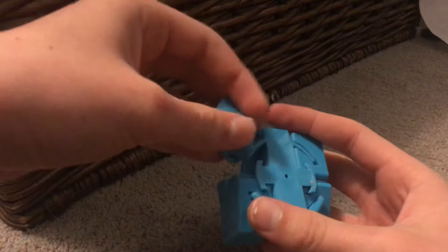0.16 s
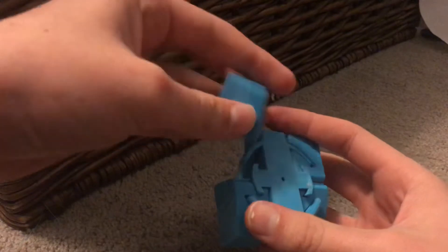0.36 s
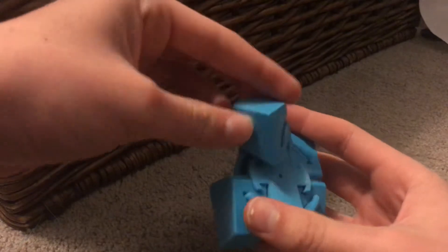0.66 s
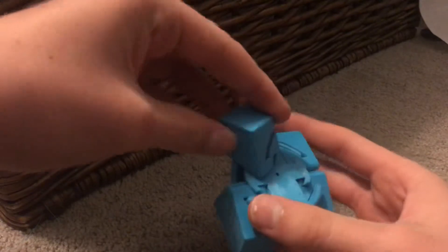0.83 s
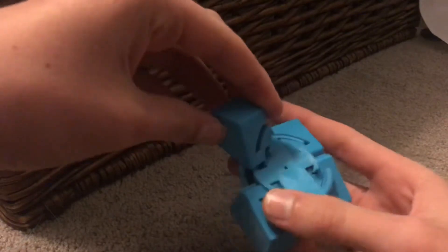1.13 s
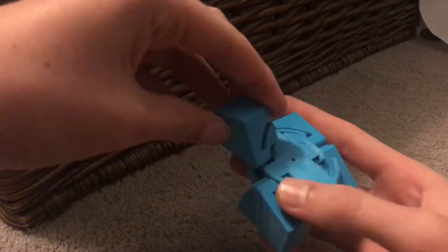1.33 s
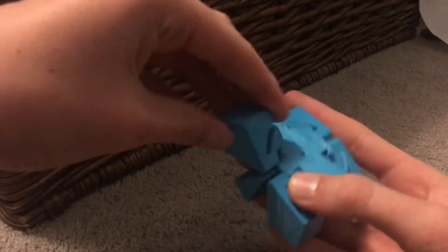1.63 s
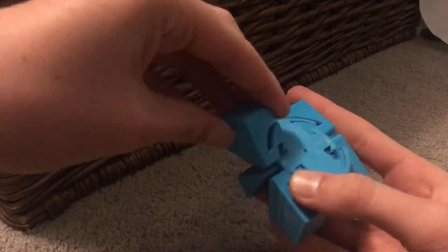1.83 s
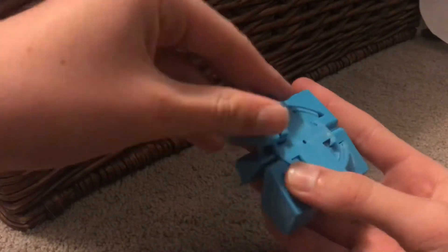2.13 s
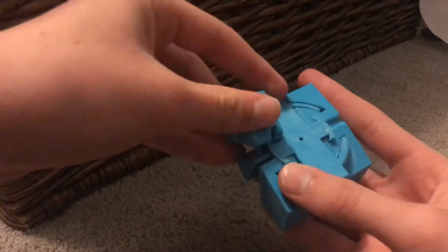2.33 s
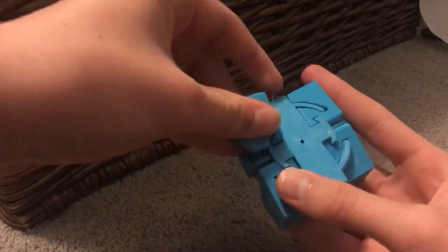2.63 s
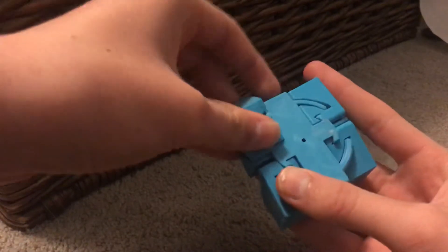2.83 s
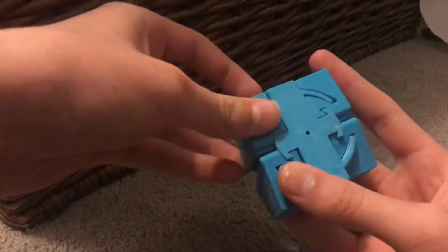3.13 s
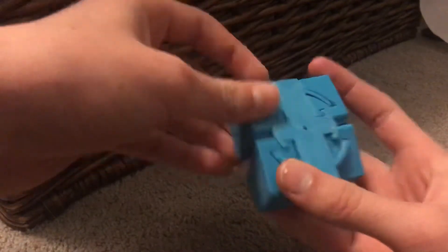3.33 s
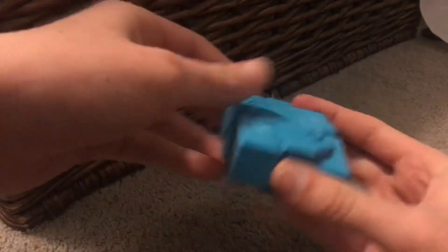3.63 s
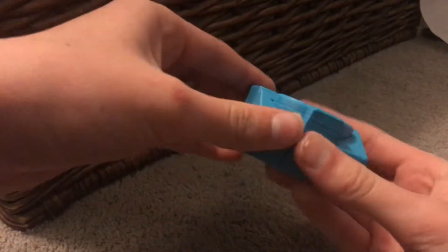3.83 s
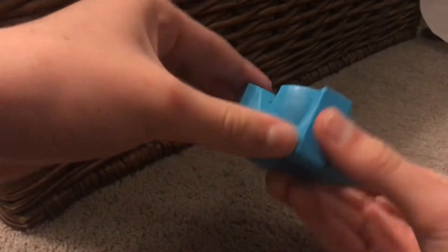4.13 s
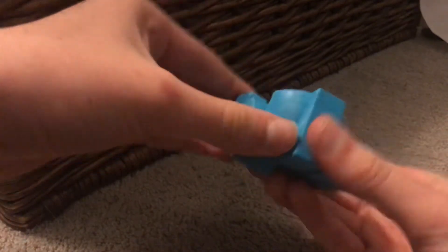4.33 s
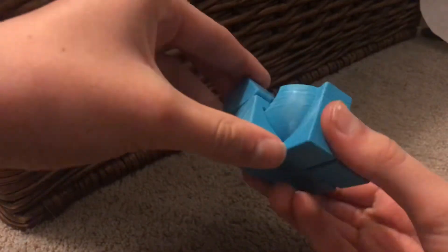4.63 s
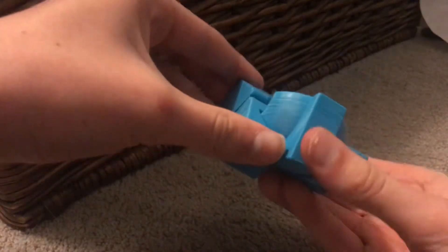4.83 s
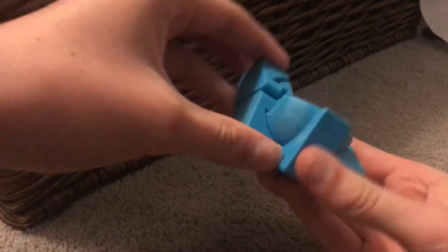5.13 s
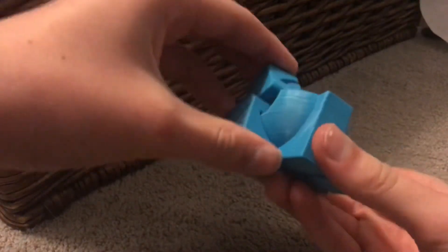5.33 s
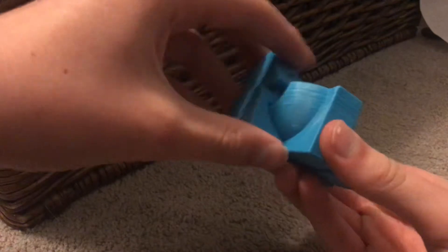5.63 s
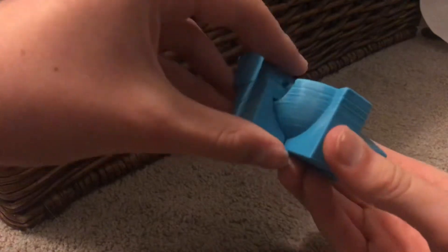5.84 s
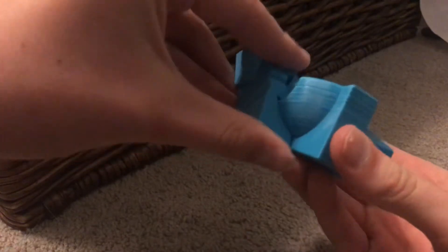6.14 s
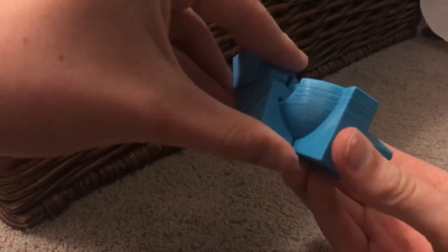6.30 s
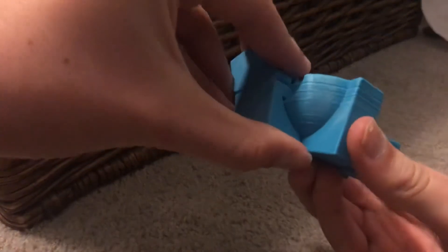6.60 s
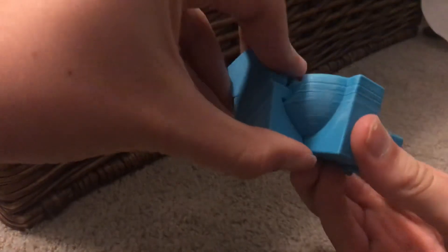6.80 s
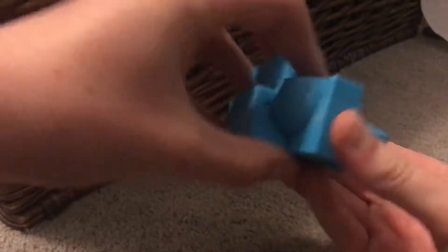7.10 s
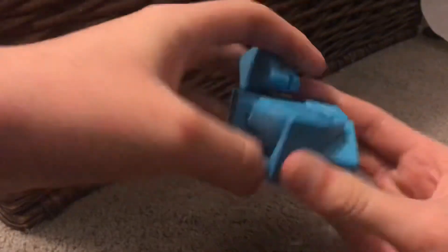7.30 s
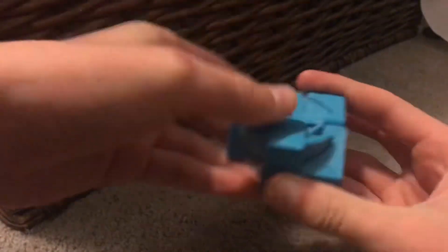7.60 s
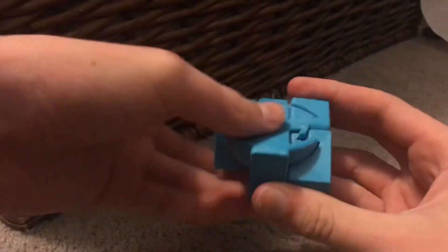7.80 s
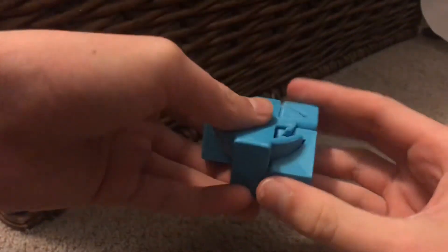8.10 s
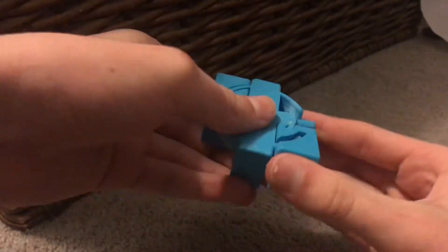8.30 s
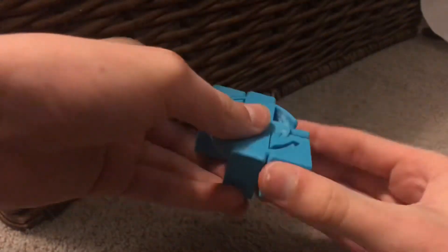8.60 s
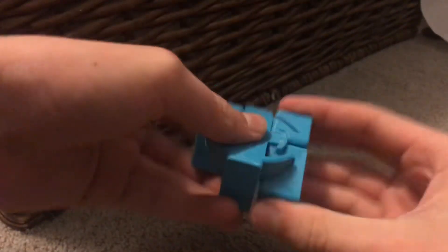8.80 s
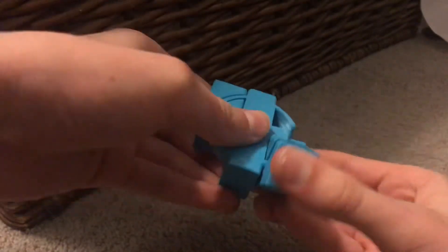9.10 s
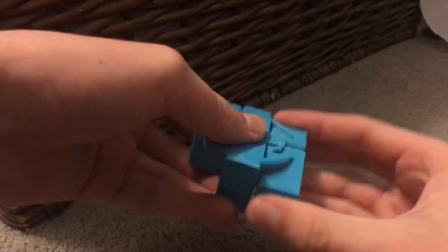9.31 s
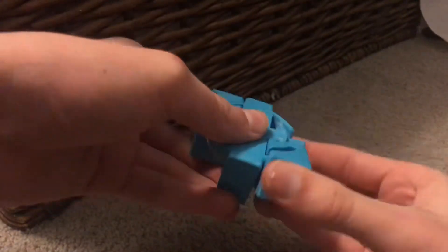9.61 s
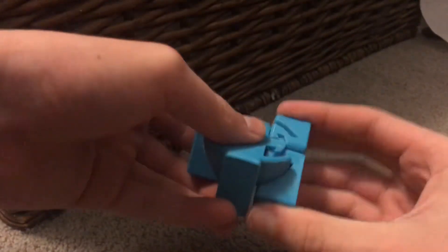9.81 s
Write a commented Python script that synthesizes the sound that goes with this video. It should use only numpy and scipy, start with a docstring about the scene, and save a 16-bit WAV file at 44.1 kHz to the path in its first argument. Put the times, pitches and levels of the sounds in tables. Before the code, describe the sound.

Close to the microphone in a small carpeted room, hands work a hollow plastic twisty puzzle. Light finger brushes and a few clicks come first, then two hard, bright snaps as layers seat. Short scrapes and denser clacks follow, with a busy rattling stretch before one layer is rocked back and forth in soft, regular rasps. Soft low hand thumps, faint mains hum and a low rush of air lie beneath.

```python
"""A plastic twisty puzzle is turned by hand close to the microphone in a small carpeted room.
Clicks and snaps are short bursts of force shaped by the spectrum of the plastic, with decaying tones added.
Scrapes, finger brushes and the final to-and-fro of one layer are tiny random slips through that spectrum.
The hands add soft low thumps; a mains hum of sines and a low rush of shaped noise lie underneath."""
import sys
import numpy as np
from scipy import signal
from scipy.fft import rfft, irfft
from scipy.io import wavfile
from scipy.ndimage import uniform_filter1d

SR = 44100
rng = np.random.default_rng(int(sys.argv[2]) if len(sys.argv) > 2 else 0)


def wav_out(sig):
    """Save sig, one row per channel (or a flat mono array), as 16-bit PCM at SR to the path in sys.argv[1]."""
    wavfile.write(sys.argv[1], SR, np.round(np.clip(np.atleast_2d(sig).T, -1, 1) * 32767).astype(np.int16))


N = 438793  # length in samples


def amp(db):
    """Turns dB into a linear gain."""
    return 10 ** (np.asarray(db) / 20)


def evened(x):
    """Scales to rms 1."""
    return x / np.sqrt(np.mean(x ** 2) + 1e-20)


def read(points, hz):
    """Joins (Hz, value) points on a log-frequency axis."""
    f, value = np.transpose(points)
    return np.interp(np.log(hz + 1), np.log(f + 1), value)


def add(mix, s, sound):
    """Mixes a sound in at time s."""
    part = mix[max(round(s * SR), 0):][:len(sound)]
    part += sound[:len(part)]


def wander(n, hz):
    """Slow chance of rms 1, changing up to about hz times a second."""
    f = np.fft.rfftfreq(n, 1 / SR)
    noise = rfft(rng.standard_normal(n))
    return evened(irfft(noise / (1 + (f / hz) ** 4), n))


def causal(db):
    """The fastest-decaying impulse response with this spectrum."""
    mirrored = np.r_[db, db[-2:0:-1]]
    log_gain = np.log(amp(mirrored))
    return np.fft.ifft(np.exp(np.conj(signal.hilbert(log_gain)))).real[:len(db)]


def bump(hz, centre_hz, width_hz):
    """Shape of one resonance, 1 at its centre."""
    return 1 / (1 + (2 * (hz - centre_hz) / width_hz) ** 2)


# Knock lies below 1.1 kHz and clack around 3 kHz: level at depth 0 in dB, and dB per dB of depth
KNOCK_DB, KNOCK_PER_DEPTH = 4, 1.07
CLACK_DB, CLACK_PER_DEPTH = 2.5, 0.57


def place_db(hz, depth_db, edge_db):
    """A deep contact gives knock, hollow body and clack; a sharp edge gives treble."""
    knock_db = KNOCK_DB + KNOCK_PER_DEPTH * depth_db
    clack_db = CLACK_DB + CLACK_PER_DEPTH * depth_db
    body = [(1100, knock_db), (1550, depth_db), (2400, depth_db)]
    clack = [(2800, clack_db), (3700, clack_db)]
    treble = [(4400, 0), (8500, 0), (11000, edge_db)]
    return read(body + clack + treble, hz)


# Resonances of the hollow plastic. Each row: centre in Hz, width in Hz, boost in dB.
SHELL = [(1740, 820, -0.5), (2414, 340, -0.5), (3180, 180, -1), (3270, 350, -1), (4440, 400, 3.5),
         (5400, 350, 1.5), (6340, 800, 2), (8830, 700, 2), (10600, 730, -3), (12090, 430, 1.5),
         (12800, 500, 4), (14800, 700, -0.5)]


def plastic(hz, colour, depth_db, edge_db):
    """Spectrum in dB of the shell, touched at one place."""
    resonances_db = sum(db * bump(hz, f, w) for f, w, db in SHELL)
    return read(colour, hz) + place_db(hz, depth_db, edge_db) + resonances_db


def fine_ripple(hz, ripple_db, spacing_hz=330):
    """Random fine ripple in the spectrum makes every contact or rub sound a little different."""
    knots = np.arange(0, SR / 2, max(spacing_hz, 100))
    ripple = ripple_db * rng.standard_normal(256)[:len(knots)]
    return np.interp(hz, knots, ripple) * np.minimum(hz / 2000, 1)  # less ripple below 2 kHz


def ping(hz, t60):
    """A single mode dies away after a piece springs free."""
    t = np.arange(SR // 8) / SR
    attack = 1 - np.exp(-t / .001)
    return amp(-60 * t / max(t60, .001)) * attack * np.sin(2 * np.pi * hz * t)


# Basic spectrum of a click. Each row: frequency in Hz, relative level in dB per Hz.
CLICK_COLOUR = [(60, -33.5), (250, -17), (550, -18), (950, -11.5), (1300, -4.5), (1800, 2.5), (3000, -1),
                (4500, 1.5), (6600, 2), (8500, -1), (10500, -2.5), (12500, -5), (15500, -7.5)]


def contact(length_s, ring_hz, depth_db, edge_db, piece_db=6, piece_width=.16, chatter=0.67, grit_db=3,
            rise=0.596):
    """One impact inside a flurry of tiny bounces, coloured by the shell and the piece; rms 1 over 2 ms."""
    hz, t = np.fft.rfftfreq(1024, 1 / SR), np.arange(1024) / SR
    ripple_db, span = 1.8, .002 * SR
    u = t / max(rise * length_s, 1 / SR)  # time in units of the rise
    sign, size = rng.standard_normal((2, len(t)))
    force = sign * amp(grit_db * size) * u * np.exp(-u)
    force *= chatter / np.linalg.norm(force)
    force[np.argmin(abs(u - 1))] += 1 - chatter  # the main impact at the height of the flurry
    colour = plastic(hz, CLICK_COLOUR, depth_db, edge_db)
    colour += piece_db * bump(hz, ring_hz, piece_width * ring_hz)
    click = signal.fftconvolve(force, causal(colour + fine_ripple(hz, ripple_db)))
    return click * np.sqrt(span) / np.linalg.norm(click)


def friction(n, slips_per_s=7000, grit_db=-1.0, catch_db=0.0, catch_hz=200):
    """Tiny slips of uneven size, bunched where the ridges catch."""
    slips = rng.standard_normal(n) * (rng.random(n) < slips_per_s / SR)
    size_db = grit_db * np.minimum(rng.exponential(1, n), 4) + catch_db * wander(n, catch_hz)
    return slips * amp(size_db)


# Basic spectrum of a scrape. Each row: frequency in Hz, relative level in dB per Hz.
SCRAPE_COLOUR = [(60, -14), (300, -15), (600, -10), (1000, -13), (1300, -10), (1800, 2.5), (2800, -2),
                 (4200, -3), (6600, 2), (8500, -2), (10500, -3), (12500, -5.5), (15500, -7.5)]
# Narrow modes that steady rubbing keeps alive. Each row: centre in Hz, width in Hz, boost in dB.
RUB_MODES = [(1900, 100, 2), (2160, 99, 2), (2420, 100, 3), (2900, 130, 2), (3460, 140, 3),
             (4540, 160, 2.5), (5100, 110, 4), (5850, 170, 2), (6430, 150, 2.5), (8080, 160, 1.5)]


def stroke(slips, hardest, swell, ease, db, ring_hz, depth_db, edge_db, start_db=-12, end_db=-12,
           piece_db=5, piece_width=0.21):
    """Friction drives the shell; pressure swells and eases off while the fine colour shifts."""
    hz = np.fft.rfftfreq(1024, 1 / SR)
    ripple_db, reach, silent_db = 2.8, 1.3, -40
    marks = hardest + np.array([-reach * swell, -swell, 0, ease, reach * ease])
    at = np.arange(max(round(marks[0] * SR), 0), min(round(marks[-1] * SR), N))
    pressure = amp(np.interp(at / SR, marks, [silent_db, start_db, 0, end_db, silent_db]))
    colour = plastic(hz, SCRAPE_COLOUR, depth_db, edge_db)
    colour += piece_db * bump(hz, ring_hz, piece_width * ring_hz)
    colour += sum(mode_db * bump(hz, f, w) for f, w, mode_db in RUB_MODES)

    def rubbed():
        """The slips through the coloured spectrum with its own random ripple."""
        return signal.fftconvolve(slips[at], causal(colour + fine_ripple(hz, ripple_db)))[:len(at)]

    early, late = rubbed(), rubbed()
    rub = early + (late - early) * np.linspace(0, 1, len(at))
    return at[0] / SR, amp(db) * evened(rub) * pressure


# Moving air. Each row: frequency in Hz, relative level in dB per Hz.
RUSH = [(18, -26.5), (35, -2.5), (57, 4.5), (90, -7.5), (170, -2), (260, -8.5), (400, -12.5), (620, -22),
        (830, -18), (1060, -22), (1300, -28), (2500, -35.5), (6000, -39), (15500, -39.5)]
RUSH_DB = -54.5  # rms
# Mains hum. Each row: frequency in Hz, rms level in dB around which it wavers.
HUM = [(120, -56), (240.5, -68.5), (1056, -76.5)]


def background(waver_db=1.06, waver_rad=.12):
    """Steady rush of air, as shaped noise, with a mains hum of sines that wavers in level and phase."""
    t, hz = np.arange(N) / SR, np.fft.rfftfreq(N, 1 / SR)
    rush = evened(irfft(rfft(rng.standard_normal(N)) * amp(read(RUSH, hz)), N))
    drift = waver_rad * wander(N, 2.7) / HUM[0][0]  # waver_rad applies to the lowest tone
    hum = np.zeros(N)
    for f, db in HUM:
        phase = f * (2 * np.pi * t + drift) + 2 * np.pi * rng.random()
        hum += amp(db) * np.sqrt(2) * np.sin(phase)
    return amp(RUSH_DB) * rush + hum * amp(waver_db * wander(N, 2.8))


CONTACT_S = .0016  # a contact lasts a moment; a loose one longer


def loose_pieces(sliding, ticks_per_s=20, tick_db=-1, hardest_db=-44, resting_db=-67, spread_db=2,
                 depth_db=8, edge_db=-4, ping_db=0, ring_s=.012):
    """Loose pieces tick faintly in the grip, and harder as a layer is pushed."""
    out = np.zeros(N)
    push = np.sqrt(abs(uniform_filter1d(sliding ** 2, SR // 50)))  # rms of the sliding over 20 ms
    push = np.clip(push, amp(resting_db), amp(hardest_db))
    for at in np.flatnonzero(rng.random(N) < ticks_per_s / SR):
        ring_hz = SHELL[rng.integers(len(SHELL))][0]
        gain = push[at] * amp(tick_db + spread_db * min(rng.exponential(), 2))
        add(out, at / SR, gain * contact(CONTACT_S, ring_hz, depth_db, edge_db))
        add(out, at / SR, gain * amp(ping_db) * ping(ring_hz, ring_s))
    return out


# A finger slides over the ridged plastic. Each row: hardest moment in seconds, swell in seconds,
# ease-off in seconds, level in dB at the hardest moment, brightest resonance in Hz, sharp edge in dB.
BRUSHES = [(.119, .12, 0.15, -67, 9000, 9), (0.343, 0.014, 0.011, -43, 13600, 25),
           (.57, .012, 0.053, -57, 8100, 15), (.934, .08, 0.16, -61, 3900, 2),
           (1.898, 0.049, 0.027, -50.5, 8600, 8), (2.001, 0.25, .039, -61, 8700, 9),
           (3.295, 0.086, 0.067, -57.5, 9250, 8), (3.505, .024, 0.053, -55, 2480, 6),
           (5.552, 0.018, 0.04, -61, 10480, 16), (7.601, 0.046, 0.024, -60.5, 3700, 3),
           (7.726, .047, .05, -63.5, 8680, 11.5)]
BRUSH_DEPTH_DB = -0.5


def brushes():
    """Skin on plastic: a fine, bright hiss of slips with little body."""
    out, slips = np.zeros(N), friction(N, slips_per_s=7300, grit_db=1.5, catch_db=2.5, catch_hz=120)
    for *motion, edge_db in BRUSHES:
        add(out, *stroke(slips, *motion, BRUSH_DEPTH_DB, edge_db))
    return out


# Pieces knock together. Each row: start in seconds, rms level of the knock in dB over 2 ms,
# ring of the piece in Hz, ring time in seconds (to fall 60 dB), depth in dB, sharp edge in dB.
CLICKS = [(.462, -39, 1150, 0.061, 2, 1), (0.467, -42, 8000, .008, 7.5, 8),
          (.491, -45.5, 1150, 0.04, 8.5, -6), (.562, -45.5, 8060, .005, 4, 7),
          (.606, -34, 3050, .005, 14, 0), (.6157, -45, 970, 0.043, 13, -6),
          (1.337, -38, 4600, 0.0054, 3, -7), (1.3687, -36, 4000, 0.0054, 4, -7),
          (1.377, -35, 2900, .005, 8, -4), (1.5002, -46.5, 3420, .005, 8.5, -7),
          (1.579, -28, 6240, .005, 1, 6.5), (1.5831, -33.5, 1670, .008, 12, -5),
          (1.692, -49, 2070, 0.011, 9, 1), (2.2493, -46.5, 6860, .005, 0.5, 3),
          (2.343, -47.5, 2200, .005, 7, -1), (2.464, -50, 6500, .005, 3, 0),
          (2.765, -48, 2800, 0.017, 5.5, -5), (2.839, -50, 2760, .005, 2.5, -1),
          (2.917, -31, 1470, 0.023, 6.5, -3), (3.0322, -42, 2860, .005, 2.5, 0),
          (3.26, -48, 2390, .005, 4.5, 0), (3.367, -43.5, 8650, .005, -2, 9),
          (3.524, -41, 2540, .008, 6, -17), (3.593, -43.5, 6400, .005, 8, -1),
          (3.897, -50.5, 6460, .005, 7, 1), (4.057, -37, 2380, .005, -7, -14),
          (4.22, -39, 1700, .008, 27, -6), (4.2567, -36.5, 2450, 0.0055, 8, -1),
          (4.307, -39.5, 7050, .005, -1, -2), (4.5075, -39.5, 2200, 0.015, 8, -6),
          (4.523, -48, 1980, .006, 8, -13), (4.5488, -36.5, 1990, 0.0066, 12.5, -10),
          (4.7273, -38.5, 2090, .005, 12, 1), (4.7335, -39, 1940, .005, 13, 2),
          (4.742, -39, 5150, .005, -9, -4), (4.7926, -37.5, 6600, .005, 8, 5),
          (4.833, -39, 2090, .005, 3, 2), (5.012, -52, 5800, .005, 8.5, 0),
          (5.067, -38.5, 2220, .005, 14, 2), (5.1148, -45.5, 5380, .005, -3, 0),
          (5.144, -34, 5470, .005, 9, -11), (5.155, -23.5, 1470, 0.0089, 4.5, 0),
          (5.16, -25, 4300, 0.014, -17, 3), (5.171, -32, 4580, 0.047, -3, 11),
          (5.262, -49, 9220, .005, -6, 9), (5.289, -43, 7200, .005, 0, -5),
          (5.3265, -44.5, 2690, .005, 5, -5), (5.6129, -27.5, 5740, .005, 5, -2),
          (5.6704, -40, 2270, 0.0046, 9, -5), (5.822, -46, 3300, 0.014, 6, -9),
          (5.912, -55, 5680, .005, -1, -3), (6.013, -39, 5710, 0.0056, -6, -5),
          (6.0612, -34.5, 6950, 0.0044, -3, -2), (6.082, -41.5, 5230, .005, -4, -12),
          (6.131, -48, 5630, .005, 5.5, -2), (6.446, -41, 3130, .008, 4.5, -8),
          (6.4554, -34.5, 6450, .005, -3, 1.5), (6.689, -31.5, 3160, 0.0059, -7.5, 1),
          (6.8715, -41, 4500, 0.0074, -1.5, -10), (6.876, -33, 10200, .007, -3.5, 9),
          (6.9372, -42, 4220, .005, -0.5, -6), (6.9784, -39.5, 4520, .008, 4, -6),
          (7.016, -36, 5940, .005, -4, 3), (7.1104, -36.5, 5840, .005, 2, -15),
          (7.126, -44, 3420, .022, 1, -11), (7.174, -39, 2000, .006, 6.5, 0),
          (7.1913, -25, 5750, 0.01, -12, 3.5), (7.196, -35, 3770, .005, -1, -4),
          (7.258, -38, 1780, 0.01, 17, -2), (7.36, -38.5, 5960, 0.0074, -2.5, -8),
          (7.393, -40, 6100, .005, 4, 0), (7.4154, -31.5, 2050, 0.05, 10, -3),
          (7.461, -41.5, 6100, .005, 3, 1), (7.8506, -37, 2890, 0.03, -4, 2),
          (7.858, -41, 5900, .005, -3.5, 4.5), (8.0265, -40.5, 1640, .006, 11.5, -4),
          (8.113, -47, 2970, 0.032, 12, -1), (8.225, -54.5, 2900, .012, 18, -1),
          (8.665, -48, 6500, .005, -3, 8), (8.886, -34.5, 1950, 0.0057, 6, -4),
          (9.264, -50, 2050, .006, 13.5, -3), (9.445, -42, 6330, .005, 8, 12),
          (9.639, -53.5, 2850, .012, 19, -8), (9.682, -33, 3520, 0.0096, 0.5, 7),
          (9.908, -41, 1530, 0.031, 24, 3)]
LOOSE_PER_DEPTH = .35  # dB per dB: a deep contact is a loose one: it lasts longer, grazes and bounces more
# A piece grazes its neighbour just before it hits, and bounces once; levels are for depth 0
LEAD_S, LEAD_DB, LEAD_LENGTH_S = .003, -19.5, .002
BOUNCE_S, BOUNCE_DB = 0.0045, -18  # average delay


def clicks(ping_db=-1):
    """A piece grazes its neighbour, knocks, bounces once and rings as long as the fingers let it."""
    out = np.zeros(N)
    for s, db, ring_hz, ring_s, depth_db, edge_db in CLICKS:
        gain, loose = amp(db), amp(LOOSE_PER_DEPTH * depth_db)
        touch = (ring_hz, depth_db, edge_db)
        bounce_at = s + BOUNCE_S * (.5 + rng.random())
        add(out, s - LEAD_S, gain * loose * amp(LEAD_DB) * contact(LEAD_LENGTH_S, *touch))
        add(out, s, gain * contact(CONTACT_S * np.sqrt(loose), *touch))
        add(out, s, gain * amp(ping_db) * ping(ring_hz, ring_s))
        add(out, bounce_at, gain * loose * amp(BOUNCE_DB) * contact(CONTACT_S, *touch))
    return out


# A rough edge judders along its groove. Each row: start in seconds, end in seconds,
# rms level in dB before the fades, resonance in Hz, its width in Hz.
JUDDERS = [(0.871, 1.0, -69, 3900, 500), (5.15, 5.18, -41, 1880, 600), (5.152, 5.178, -34, 4300, 470),
           (7.17, 7.41, -65, 2010, 170), (7.222, 7.282, -45, 1830, 510), (6.95, 7.02, -58, 4500, 350),
           (7.307, 7.415, -62, 5970, 370)]


def judders():
    """Friction that feeds a single resonance."""
    out, hz = np.zeros(N), np.fft.rfftfreq(SR, 1 / SR)
    for start, end, db, ring_hz, width_hz in JUDDERS:
        length = max(round((end - start) * SR), 64)
        rub = irfft(rfft(friction(SR)) * bump(hz, ring_hz, width_hz))[:length]
        add(out, start, amp(db) * evened(rub) * signal.windows.tukey(len(rub), .5))
    return out


# The hands shift their grip. Each row: start in seconds, level in dB at the crest of the envelope,
# pitch in Hz.
THUMPS = [(1.049, -40, 75.5), (1.536, -36.5, 54), (2.64, -39, 162), (2.907, -31.5, 48), (3.014, -42, 69),
          (4.69, -37, 58.4), (4.889, -38, 64), (4.955, -42.5, 61.5), (5.48, -40, 64), (5.544, -40, 53),
          (7.548, -39.5, 168), (7.736, -41.5, 67)]


def thumps(rise_s=0.0084, rough=.4):
    """Soft, low, heavily damped blows of the hands: a sine roughened by slow noise."""
    out, t = np.zeros(N), np.arange(SR // 5) / SR
    envelope = t / rise_s * np.exp(1 - t / rise_s)
    for s, db, hz in THUMPS:
        swing = np.sin(2 * np.pi * hz * t) + rough * wander(len(t), 2 * hz)
        add(out, s, amp(db) * envelope * swing)
    return out


# A piece drags along its groove. Each row: hardest moment in seconds, swell in seconds,
# ease-off in seconds, level in dB at the hardest moment, ring of the piece in Hz, depth in dB.
SCRAPES = [(1.309, 0.016, 0.0076, -49, 4660, 2), (1.363, 0.024, .06, -50, 2880, 2.5),
           (1.572, 0.047, .049, -52.5, 5860, -5), (2.914, 0.0099, .006, -44.5, 1550, 7),
           (4.06, 0.0073, .022, -38, 2370, 7.5), (4.116, 0.034, 0.03, -44.5, 2050, 7.5),
           (4.215, 0.0067, 0.054, -47, 2020, 6), (4.463, 0.018, 0.041, -45.5, 2110, 7.5),
           (4.548, 0.0057, 0.0044, -47, 1930, 11), (4.731, .008, .012, -36.5, 1980, 12.5),
           (5.072, 0.014, .035, -46, 2250, 1), (5.164, .012, 0.013, -29.5, 6500, -7),
           (5.32, 0.0056, 0.014, -38, 2350, 3), (5.614, .009, 0.047, -46, 5860, 14),
           (5.667, 0.012, .061, -46.5, 2300, 5.5), (5.82, 0.0075, .031, -52, 3440, 6.5),
           (6.446, 0.011, 0.0088, -49, 6420, 1), (6.8, 0.016, 0.0065, -45.5, 4570, 1.5),
           (6.942, .005, 0.055, -47.5, 4260, 5), (7.033, 0.047, 0.062, -47, 6400, -2),
           (7.102, 0.014, 0.031, -45.5, 3400, 6), (7.197, 0.053, 0.032, -50, 5760, 14),
           (7.24, 0.035, 0.059, -46, 5770, 6), (7.387, 0.099, 0.048, -50, 6140, 11.5)]
SCRAPE_EDGE_DB = -0.5


def scrapes():
    """Pieces drag and catch on each other's ridges, in gritty bunches of slips."""
    out, slips = np.zeros(N), friction(N, slips_per_s=5500, grit_db=2.5, catch_db=2.5, catch_hz=149)
    for row in SCRAPES:
        add(out, *stroke(slips, *row, SCRAPE_EDGE_DB))
    return out


# A layer snaps into line. Each row: seating moment in seconds, rms level in dB over 2 ms, run-up in seconds,
# ring of the piece in Hz, ring time in seconds (to fall 60 dB), depth in dB, sharp edge in dB.
SNAPS = [(2.6442, -15, .0058, 14820, 0.0054, -4.5, -6), (3.7466, -11.5, .0115, 9310, 0.0044, -9.5, 2.5)]
# Narrow tones that colour a snap, partly from its closely spaced contacts. Each row: frequency in Hz,
# level in dB against the snap before its depth colours it, time in seconds to fall 60 dB.
SNAP_TONES = [(1170, -6, 0.0084), (1770, -4.5, 0.014), (2372, 0.5, .014), (4220, -13.5, .022),
              (4705, -8.5, .028), (5300, -9.5, 0.022), (5600, -11, 0.032), (6350, -11, .025),
              (6880, -2.5, .014), (7175, -13, .025), (8165, -14.5, 0.033), (8540, -6.5, 0.016),
              (8870, -14, .025), (9000, -11, .025), (9350, -14, 0.029), (14900, -7.5, .006)]
# Contacts around the seating, in dB against it; the catch comes at this share of the run-up before it
GRAZE_DB, CATCH_SHARE, CATCH_DB, REBOUND_S, REBOUND_DB = -20.5, 0.43, -7.5, 0.0024, -2


def snaps(contact_s=0.0015, ping_db=4, slide_db=-25, slide_hz=2400, slide_depth_db=4, slide_edge_db=-4):
    """A layer under strain slides, catches, slams into its seat and rebounds; narrow tones colour the snap."""
    out, slips = np.zeros(N), friction(N)
    for seat, db, run_up, ring_hz, ring_s, depth_db, edge_db in SNAPS:
        catch_s = CATCH_SHARE * run_up
        slide = (run_up, run_up, db + slide_db, slide_hz, slide_depth_db, slide_edge_db)
        add(out, *stroke(slips, seat - catch_s, *slide))
        for delay, step_db in [(-run_up, GRAZE_DB), (-catch_s, CATCH_DB), (0, 0), (REBOUND_S, REBOUND_DB)]:
            add(out, seat + delay, amp(db + step_db) * contact(contact_s, ring_hz, depth_db, edge_db))
        for hz, tone_db, t60 in [(ring_hz, ping_db, ring_s), *SNAP_TONES]:
            add(out, seat, amp(db + tone_db + place_db(hz, depth_db, 0)) * ping(hz, t60))
    return out


# One layer is rocked to and fro. Each row: fastest moment in seconds, swell in seconds,
# ease-off in seconds, level in dB at the fastest moment, ring of the piece in Hz.
TURNS = [(8.126, 0.035, 0.048, -46.5, 2990), (8.353, 0.1, .035, -50.5, 3400),
         (8.477, 0.029, 0.07, -45.5, 2470), (8.699, 0.044, 0.077, -49, 3430),
         (8.888, 0.041, 0.057, -40.5, 1900), (8.985, 0.033, 0.047, -51, 2750),
         (9.21, 0.11, 0.062, -51.5, 3430), (9.475, 0.049, 0.046, -44.5, 1930),
         (9.717, 0.055, 0.05, -47.5, 3430), (9.908, .051, 0.027, -48, 2430)]
TURN_DEPTH_DB, TURN_EDGE_DB = 6.5, 2


def turns():
    """The same two faces rub on every turn, so depth and edge stay the same."""
    out, slips = np.zeros(N), friction(N, slips_per_s=6500, grit_db=0.0, catch_db=2.64, catch_hz=70)
    for row in TURNS:
        add(out, *stroke(slips, *row, TURN_DEPTH_DB, TURN_EDGE_DB, end_db=-11, piece_db=3, piece_width=0.09))
    return out


# How long the room rings. Each row: frequency in Hz, time in seconds to fall 60 dB.
ROOM_T60 = [(200, .18), (1500, .17), (5000, .18), (9000, .18), (15000, .14)]


def tail(first_s=.004, treble_db=-3):
    """Sparse reflections, each band dying at its own speed."""
    n = SR // 3
    taps = rng.standard_normal(n) * (rng.random(n) < 6000 / SR)  # about 6000 reflections a second
    taps *= np.arange(n) > first_s * SR
    hz, t, z = signal.stft(taps, SR, nperseg=256)
    start_db = read([(8000, 0.011), (13000, treble_db)], hz)[:, None]
    decay_db = -60 * t / read(ROOM_T60, hz)[:, None]
    echo = signal.istft(z * amp(start_db + decay_db), SR, nperseg=256)[1]
    return echo / np.linalg.norm(echo)


def room(x, count=3):
    """Faint echo, blended from random tails that take turns every few milliseconds to keep it smooth."""
    cycle = np.arange(N) / SR / .004  # one round of all the tails lasts 4 ms
    shares = [np.maximum(np.cos(2 * np.pi * (cycle - k / count)), 0) for k in range(count)]
    total = np.linalg.norm(shares, axis=0)
    wet = sum(signal.oaconvolve(x * share / total, tail())[:N] for share in shares)
    return signal.sosfilt(signal.butter(2, 1200, "high", fs=SR, output="sos"), wet)


def scene(room_db=-22):
    """The puzzle close by, its faint echo, the hands, the room's hum and the rush of air."""
    lows = thumps() + background()
    sliding = scrapes() + turns() + judders()
    puzzle = sliding + brushes() + clicks() + snaps() + loose_pieces(sliding)
    return (puzzle + amp(room_db) * room(puzzle) + lows)[None]


EDGE_HZ = 15950  # upper band limit


def record(dry, notch_hz=10400, notch_width_hz=900, notch_db=-3):
    """The microphone port has a shallow treble notch and drops the deepest bass; then the band limit."""
    hz = np.fft.rfftfreq(N, 1 / SR)
    ported = irfft(rfft(dry) * amp(notch_db * bump(hz, notch_hz, notch_width_hz)), N)
    lean = signal.sosfilt(signal.butter(4, 31, "high", fs=SR, output="sos"), ported)
    band_limit = signal.firwin(401, EDGE_HZ, window=("kaiser", 9), fs=SR)
    return signal.oaconvolve(lean, band_limit[None], "same")


dry = scene()
out = record(dry)
wav_out(out)
```